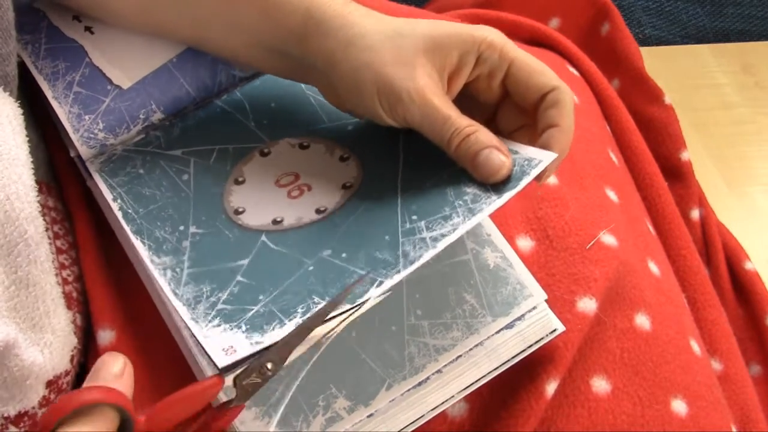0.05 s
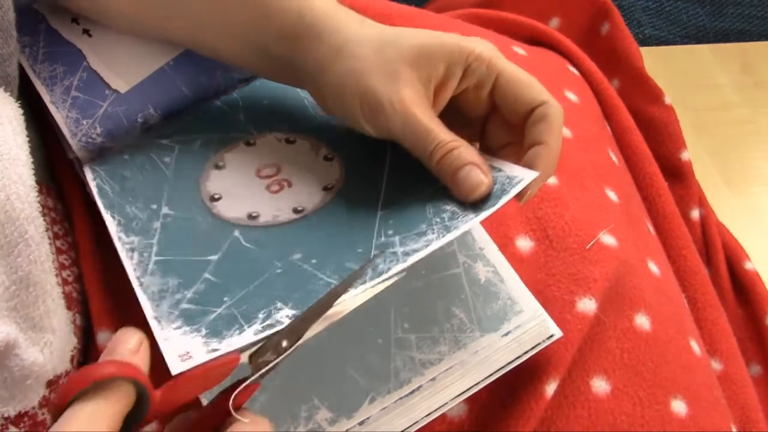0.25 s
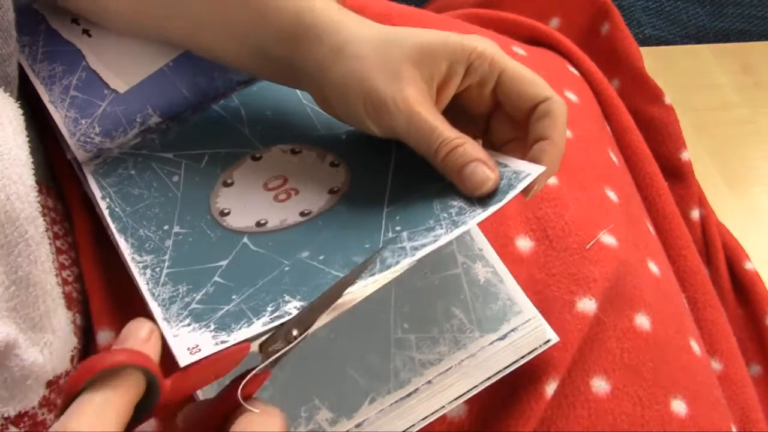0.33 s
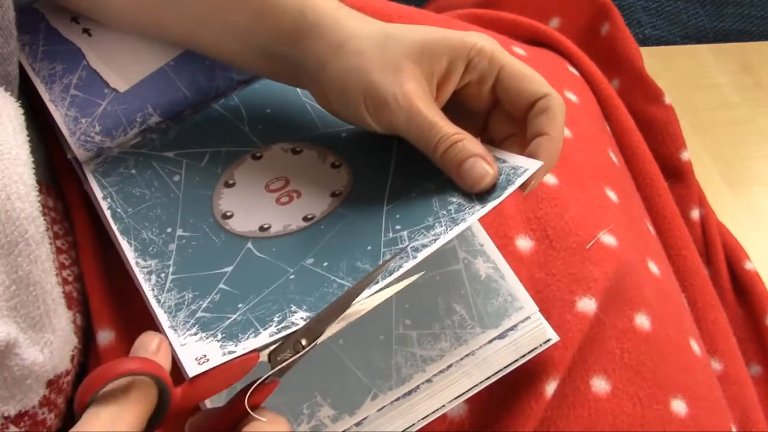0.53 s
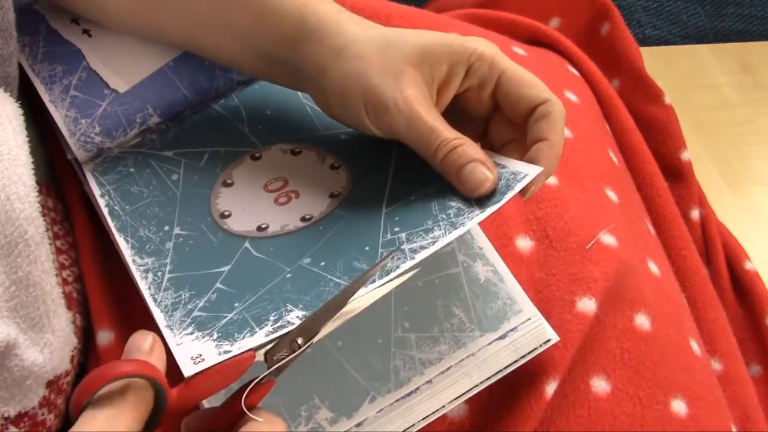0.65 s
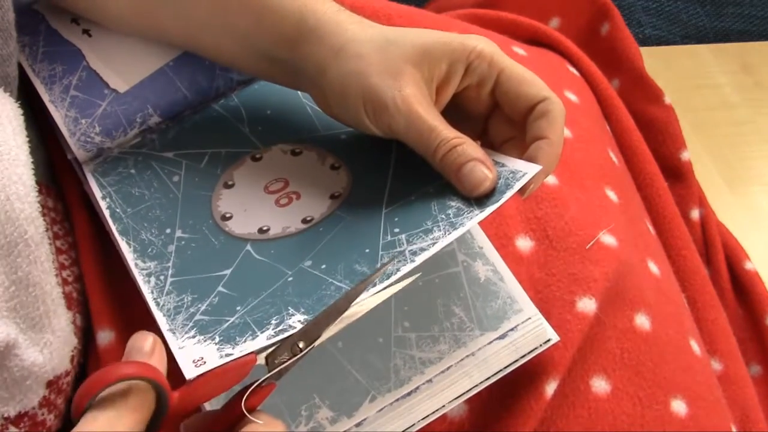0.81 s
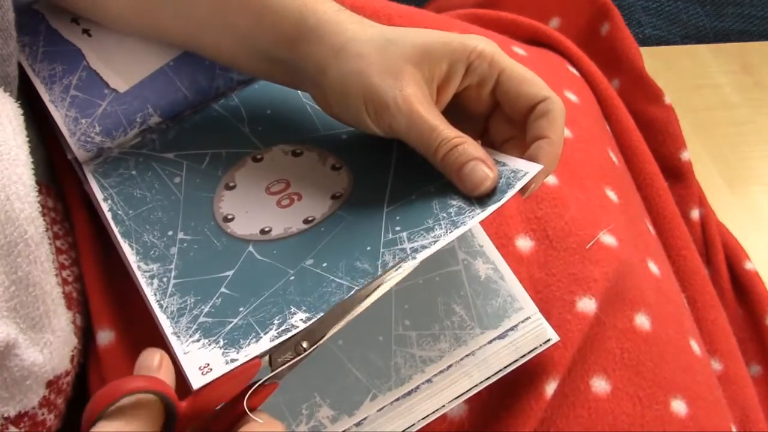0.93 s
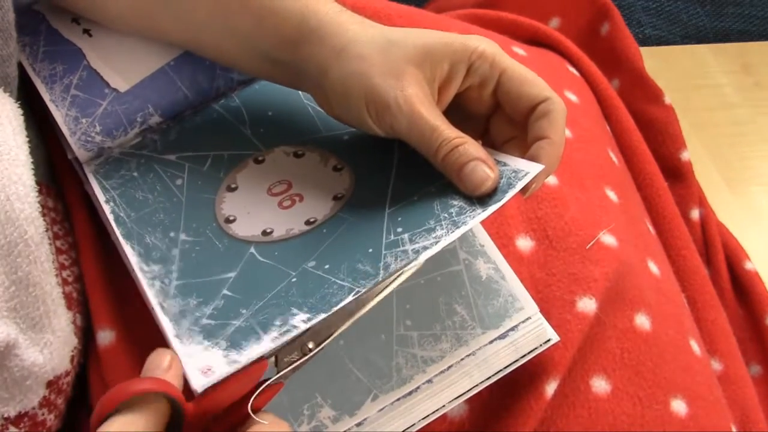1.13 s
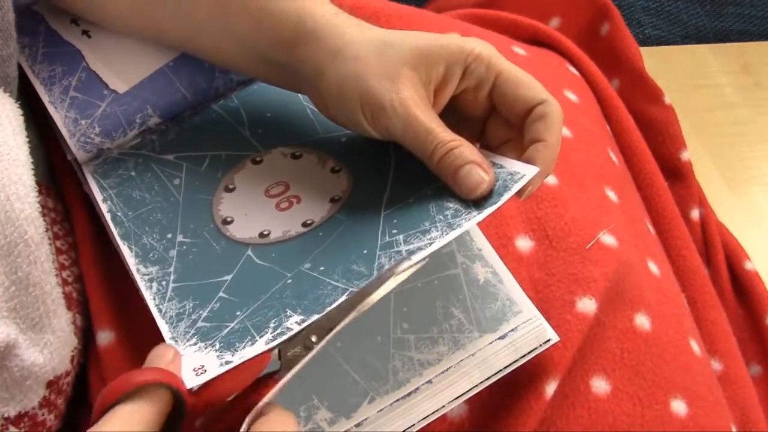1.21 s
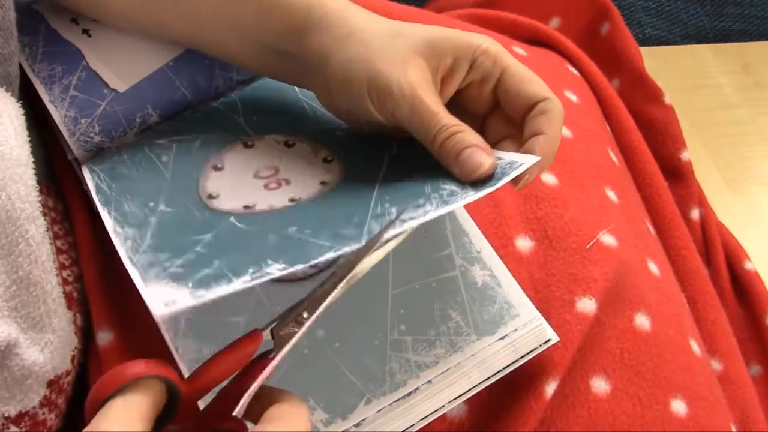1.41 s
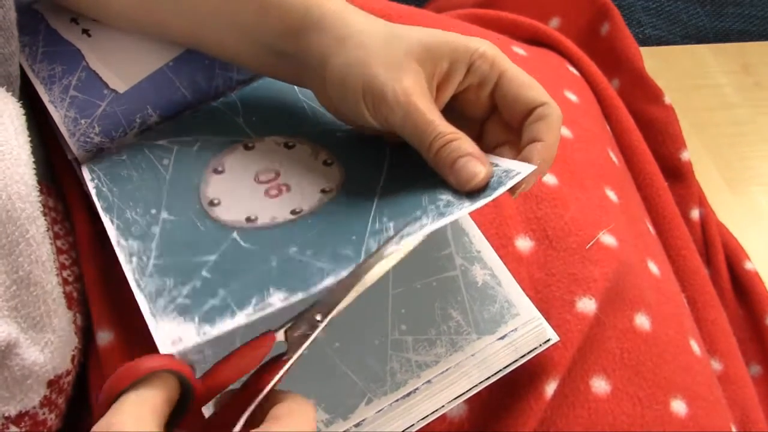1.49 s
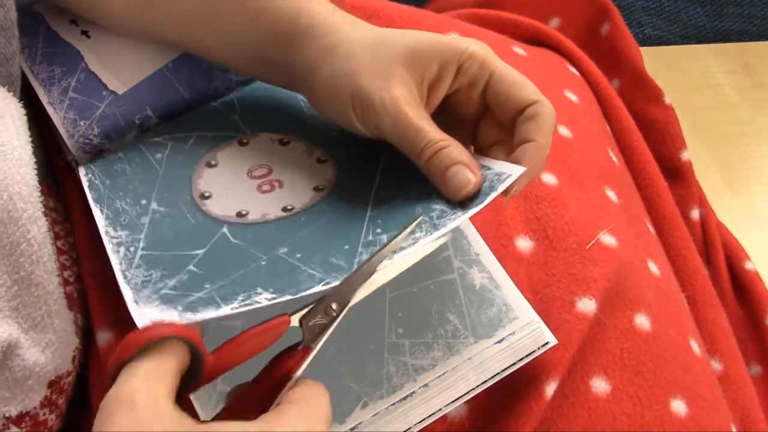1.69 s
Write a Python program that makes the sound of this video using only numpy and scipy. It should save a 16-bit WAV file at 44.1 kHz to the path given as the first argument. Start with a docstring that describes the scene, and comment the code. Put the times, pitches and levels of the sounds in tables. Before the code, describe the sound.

Scissors cutting a thick book page, heard close and nearly centred in a quiet small room. From 0 to 0.4 seconds blades scrape and click, with a knock at 0.2 and the loudest metallic clack near 0.27. A lull holds only faint rustling. From 0.9 to 1.1 fibres crackle and tear in sharp bursts. From 1.2 to 1.75 blades scrape, tick and knock, strongest near 1.46.

```python
"""Scissors cut a thick book page close to the microphone in a quiet room, while the page rustles faintly.
First the blades scrape along each other and the sheet (filtered grains) and snap shut with a clack
(ringing steel modes and a slap of paper noise over soft thumps and clicks). After a lull they bite again:
fibres crackle, and bursts of tearing make the sheet ring. Last, the scissors are reopened and pushed on,
scraping, knocking and ticking against the page. A weak room tail and a faint stereo smear surround it all."""
import sys
import numpy as np
from scipy import signal
from scipy.fft import rfft, irfft, next_fast_len
from scipy.io import wavfile
from scipy.ndimage import map_coordinates

SR = 44100
rng = np.random.default_rng(int(sys.argv[2]) if len(sys.argv) > 2 else 0)


def int16_out(signal):
    """Quantize to a 16-bit WAV file."""
    q = np.round(np.clip(np.atleast_2d(signal).T, -1, 1) * 32767)
    wavfile.write(sys.argv[1], SR, q.astype(np.int16))


N = 77175


def amp(db):
    """Turn decibels into a gain."""
    return 10 ** (np.asarray(db) / 20)


def unit(x):
    """Scale to an rms (average strength) of 1."""
    return x / np.sqrt(np.mean(x ** 2) + 1e-20)


def clock():
    """The time of each sample in seconds."""
    return np.arange(N) / SR


def along(points, hz):
    """Read a curve of (hz, value) points, joined on a logarithmic pitch axis."""
    point_hz, value = np.transpose(points)
    return np.interp(np.log(hz + 1), np.log(point_hz + 1), value)


def wobble(rate):
    """A smooth random curve with rate random knots a second."""
    return map_coordinates(rng.standard_normal(N // 50), [clock() * rate], mode="mirror")


def coloured(x, spectrum, tilt_db=0):
    """Filter x to a spectrum shape of unit power, tilted by tilt_db per octave above 1500 Hz."""
    m = 2 * next_fast_len(N // 2 + SR // 8)
    hz = np.fft.rfftfreq(m, 1 / SR)
    octaves = np.log2(np.maximum(hz, 1500) / 1500)
    gain = unit(amp(along(spectrum, hz) + tilt_db * octaves))
    # folding the cepstrum makes the filter respond only after its input, never before
    cepstrum = irfft(np.log(np.maximum(gain, 1e-6)))
    fold = np.r_[1, np.full(m // 2 - 1, 2), 1, np.zeros(m // 2 - 1)]
    response = np.exp(rfft(cepstrum * fold))
    return irfft(rfft(x, m) * response)[:N]


def grains(rate, spread_db):
    """Tiny impulses of random time, sign and size, about rate a second, with rms 1."""
    hits = rng.random(N) < rate / SR
    signs = rng.choice([-1, 1], N)
    sizes = amp(spread_db * np.clip(rng.standard_normal(N), -2, 2))
    return unit(hits * signs * sizes)


def burst(x, envelope):
    """Shape x so that it carries exactly the energy of the envelope."""
    return unit(x * envelope) * np.sqrt(np.mean(envelope ** 2))


def stroke(start, length, swell_db, release):
    """Envelope of one movement: quick attack, swelling hold, then a fall of 60 dB per release time."""
    attack_s = 0.011
    t = clock() - start
    attack = np.clip(t / attack_s, 0, 1)
    swell = swell_db * (np.clip(t / length, 0, 1) - .5)
    fall = 60 * np.maximum(t - length, 0) / release
    return attack * amp(swell - fall)


def sliding():
    """Blades rub in dense micro-slips: a papery body, a scrape and a steely hiss on top."""
    # blade strokes: start_s, length_s, level_db, swell_db (over the stroke),
    # body_db and hiss_db (added to the layer's level), release_s (time to fall 60 dB)
    strokes = [(-.01, 0.023, -47.5, -10, 4, 4, .06), (0.015, 0.039, -61, 8, 4.5, -7, 0.15),
               (.112, 0.05, -51.5, 10.5, -3, -3.5, 0.074), (0.17, 0.026, -45, -11, 2.5, -18, 0.061),
               (0.204, 0.075, -53, 0, 0, 0, 0.059), (0.279, .036, -53, -2, 7, 6.5, .024),
               (0.312, 0.058, -45.5, -1.5, -5.5, 2, 0.064), (0.428, 0.032, -52, 1, 1, -5, 0.11),
               (0.62, 0.089, -64.5, -2.5, 0.5, -1.5, 0.16), (1.218, 0.031, -47.5, 2.5, -4, -4.5, 0.026),
               (1.249, 0.027, -45, 1.5, 0.5, 0.5, 0.066), (1.324, 0.016, -59.5, 6.5, 2, -6.5, 0.26),
               (1.417, 0.0097, -44.5, 3.5, 0.5, -1, 0.034), (1.43, 0.068, -51, -0.5, 1, -7, 0.05),
               (1.526, 0.061, -45, 7.5, 0, -4, 0.053), (1.587, 0.027, -45, 5, -2, -2.5, 0.17),
               (1.668, 0.034, -53.5, 6, 0.5, -4, .04), (1.706, 0.061, -52, -12, -4, 2.5, .05)]
    # sheet rubbed by the blades: pitch_hz, level_db (per Hz, shape only)
    body_colour = [(30, -54), (100, -34), (200, -21.5), (400, -8.5), (620, -11.5), (1150, -7), (1550, -1.5),
                   (2150, -11.5), (3200, -32), (16000, -78)]
    # blades scraping along each other: pitch_hz, level_db (per Hz, shape only)
    scrape_colour = [(500, -36), (1700, -23.5), (2250, -3.5), (2700, 1), (3400, -2.5), (4400, -14),
                     (6000, -22), (16000, -35)]
    # blades hissing along each other: pitch_hz, level_db (per Hz, shape only)
    hiss_colour = [(2500, -46), (4000, -7), (5200, -5), (6000, -4.5), (7300, 2), (8300, -7), (9300, -12.5),
                   (12000, -17), (16000, -30)]
    body_level_db, scrape_level_db, hiss_level_db = -5.5, -1.5, -8.5
    slips_per_s, slip_spread_db, waver_db = 5000, 4, 1.2

    body, scrape, hiss = np.zeros((3, N))
    for start, length, db, swell_db, body_db, hiss_db, release in strokes:
        envelope = amp(db) * stroke(start, length, swell_db, release)
        body += envelope * amp(body_level_db + body_db)
        scrape += envelope * amp(scrape_level_db)
        hiss += envelope * amp(hiss_level_db + hiss_db)
    waver = amp(waver_db * wobble(140))
    out = np.zeros(N)
    for level, colour in [(body, body_colour), (scrape, scrape_colour), (hiss, hiss_colour)]:
        slips = grains(slips_per_s, slip_spread_db)
        out += coloured(level * waver * slips, colour)
    return out


def rustling():
    """The held page stirs faintly all the time: sparse grains of wavering strength."""
    # handled page: pitch_hz, level_db (per Hz, shape only)
    page_colour = [(30, -61), (120, -22), (300, 6.5), (600, -8), (1050, 7.5), (1600, 1), (2200, -3),
                   (2900, -8), (5000, -14), (16000, -21)]
    level_db, waver_db = -70.5, 6
    stirring = grains(1500, 6.0) * amp(waver_db * wobble(25.93))
    return amp(level_db) * unit(coloured(stirring, page_colour))


def room_tone():
    """Steady quiet air as filtered noise, in mid (left and right alike) and side (their difference)."""
    # room tone: pitch_hz, level_db (per Hz, shape only)
    air_colour = [(25, -23), (60, -12.5), (130, -1), (300, 1), (800, -4.5), (2100, -8), (6000, -19.5),
                  (11000, -24.5), (14000, -34), (16000, -63)]
    # how alike left and right are: pitch_hz, likeness (1 = identical)
    likeness = [(30, 0.19), (80, 0.48), (170, 0.18), (400, 0.25), (2000, 0.63), (12000, 1)]
    level_db = -66
    hz = np.fft.rfftfreq(N, 1 / SR)
    turn = np.arccos(np.clip(along(likeness, hz), -1, 1)) / 2
    noise = rfft(rng.standard_normal((2, N)))
    shares = [np.cos(turn), np.sin(turn)]  # mid and side
    air = irfft(noise * amp(along(air_colour, hz)) * shares, N)
    return amp(level_db) * air / np.std(air[0])


def pinging():
    """One resonance of blade or sheet sings out briefly, as the blades catch or the paper snaps."""
    # single resonances of blade or sheet: start_s, level_db, pitch_hz, t60_s (time to fall 60 dB)
    pings = [(0, -44, 1432, 0.092), (0, -39.5, 2460, 0.057), (0.2018, -22.5, 2660, 0.018),
             (0.219, -27.5, 3760, 0.0076), (.741, -48.5, 1610, 0.019), (1.0667, -19, 2780, 0.02),
             (1.1032, -23.5, 2850, 0.019), (1.4647, -28, 1597, 0.027), (1.4652, -26, 2480, 0.024),
             (1.4766, -29, 2680, .009)]
    attack_s = 0.00038  # time constant
    out = np.zeros(N)
    for start, db, hz, t60 in pings:
        t = np.maximum(clock() - start, 0)
        envelope = amp(db - 60 * t / t60) * (1 - np.exp(-t / attack_s))
        out += envelope * np.sin(2 * np.pi * (hz * t + rng.random()))
    return out


def clicking():
    """An edge catches and lets go: a sharp crack of dense grains that dies away fast."""
    # catching edges: start_s, level_db, t60_s (time to fall 60 dB), tilt_db (per octave)
    catches = [(0.053, -49.5, 0.021, -4), (0.1223, -50, .018, -5.5), (0.1318, -48.5, 0.052, -1),
               (0.1547, -32.5, 0.018, -0.5), (0.175, -43.5, 0.036, 10), (0.19, -39, 0.015, -6),
               (0.192, -36, 0.024, -8.5), (0.201, -28.5, 0.014, -5), (0.2645, -20.5, 0.011, -1.5),
               (0.3316, -42, .014, -5), (0.397, -49.5, 0.073, -6.5), (.715, -52.5, 0.01, 13),
               (1.2715, -34.5, 0.0085, 0.5), (1.3964, -44.5, 0.046, -6), (1.464, -34.5, 0.016, -0.5),
               (1.474, -34, 0.014, -3), (1.688, -47.5, 0.025, 4)]
    # sound of a catch: pitch_hz, level_db (per Hz, shape only)
    click_colour = [(30, -64), (130, -40), (400, -4), (1200, -4.5), (2800, 7), (4300, -1), (6000, 0.5),
                    (8600, -0.5), (10500, -6.5), (13000, -14.5), (16000, -23.5)]
    out = np.zeros(N)
    for start, db, t60, tilt_db in catches:
        t = clock() - start
        envelope = (t >= 0) * amp(db - 60 * np.maximum(t, 0) / t60)
        out += coloured(burst(grains(12000, 5.2), envelope), click_colour, tilt_db)
    return out


def thumping():
    """The page stack flexes under the harder pushes: a soft thump of a few low modes."""
    # pushes of the blades: start_s, level_db, pitch_hz, t60_s (time to fall 60 dB)
    pushes = [(0.185, -46, 262, 0.077), (0.2181, -43.5, 340, .045), (.268, -40.5, 206, 0.075),
              (0.304, -47.5, 345, 0.037), (0.372, -45, 350, 0.027), (1.27, -42.5, 310, 0.037),
              (1.461, -35, 375, 0.029), (1.475, -43.5, 305, 0.057), (1.545, -49, 377, 0.048)]
    # ways the stack swings: multiple (of the pitch), level_db (relative)
    stack_modes = [(.58, -16), (.84, -9), (1.001, 3.5), (1.2, -2)]
    attack_s = 0.0016  # time constant
    out = np.zeros(N)
    for start, db, hz, t60 in pushes:
        t = np.maximum(clock() - start, 0)
        envelope = amp(db - 60 * t / t60) * (1 - np.exp(-t / attack_s)) ** 2
        flex = np.zeros(N)
        for multiple, level in stack_modes:
            flex += amp(level) * np.sin(2 * np.pi * (hz * multiple * t + rng.random()))
        out += burst(flex, envelope)
    return out


def knocking():
    """Steel meets steel and rings the scissors; the hand damps them fast and a faint ring lingers."""
    # the scissors' ring: pitch_hz, level_db (relative), t60_s (before the knock's share)
    blade_modes = [(290, 1, 0.014), (380, -10, 0.042), (464.5, -12, 0.072), (609, -12, 0.038),
                   (773, -12, 0.061), (900, -12.5, 0.075), (1003, -2, 0.076), (1150, -2, 0.045),
                   (1325, -1, 0.046), (1563, 2, 0.035), (1648, 1, 0.038), (2026, 8, 0.021),
                   (2130, -8.5, .05), (2330, -11, 0.017), (2454, 1, 0.035), (2560, -5, 0.025),
                   (2940, -2.5, 0.022), (3330, 0, .016), (3730, -2, 0.014)]
    # knocks: start_s, ring_db, middle_db, treble_db, bass_db (added to those modes),
    # share (ring length as a fraction)
    knocks = [(0.2026, -27, 1.5, -5, 1, 0.53), (0.2659, -15.5, -4.5, -2, 1, 0.89),
              (1.273, -41.5, 2, 5, 1, 0.83), (1.422, -36.5, 2, 6, 9, 0.84), (1.4642, -24, 8, 0, 5, 0.6),
              (1.4754, -33, 7.5, 4, 12, 0.94)]
    attack_s = 0.0013  # time constant
    after_ring_db, after_ring_s = -37, 0.37  # relative level; time to fall 60 dB, before the share
    phase_scatter, low_cut_hz = .14, 201  # scatter in turns
    out, t = np.zeros(N + SR), np.arange(SR // 4) / SR
    hz, mode_db, t60 = np.transpose(blade_modes)[:, :, None]
    for start, db, middle_db, treble_db, bass_db, share in knocks:
        change_db = np.select([hz > 2200, hz > 1430, hz < 600], [treble_db, middle_db, bass_db])
        gains = amp(mode_db + change_db)
        decay = amp(-60 * t / (t60 * share))
        decay = decay + amp(after_ring_db - 60 * t / (after_ring_s * share))
        # neighbouring modes swing in opposition, give or take the scatter
        phase = np.arange(len(hz))[:, None] / 2 + phase_scatter * rng.standard_normal(hz.shape)
        ring = np.sum(gains * decay * np.sin(2 * np.pi * (hz * t + phase)), axis=0)
        attack = 1 - np.exp(-t / attack_s)
        out[round(start * SR):][:len(t)] += amp(db) * ring * attack * 2 / np.linalg.norm(gains)
    low_cut = signal.butter(2, low_cut_hz, "highpass", fs=SR, output="sos")
    return signal.sosfilt(low_cut, out[:N])


def slapping_and_cutting():
    """Paper slaps under the hard snaps; in the bite, fibres crackle and tear in bursts that ring the bent sheet."""
    # bursts of paper noise: slaps under the two hard snaps (first two rows), then tearing fibres:
    # centre_s, spread_s (of the bell-shaped burst), level_db, crackle_db (relative to the burst),
    # pitch (of the sheet, as a ratio), tilt_db (per octave)
    paper_bursts = [(0.271, 0.0012, -27, -33, 0.83, -7.5), (1.4649, 0.0015, -29, -18, 0.97, -7.5),
                    (0.919, 0.0035, -45.5, 6.5, 1, 1), (0.946, 0.0074, -48.5, 11, 0.91, -8),
                    (.9702, 0.002, -35, 4.5, 0.98, 2), (.977, 0.0031, -39.5, 3.5, 1.02, -3.5),
                    (.994, 0.003, -36.5, 0, 1.04, 3), (1.007, 0.0017, -36, 4.5, 1.07, 0.5),
                    (1.0229, 0.0021, -33.5, 0.5, 0.92, 2), (1.0264, 0.0024, -36, -7, 1.01, -.5),
                    (1.0399, 0.0017, -29.5, -9, 1.07, 1), (1.0435, 0.0021, -33, -13, 0.99, -0.5),
                    (1.053, 0.0034, -35.5, -15, 1.016, -2), (1.0684, 0.0015, -25.5, -8, 1.02, 2.5),
                    (1.0999, 0.0019, -35.5, 8, 1, 2), (1.1027, 0.00082, -27, -1.5, 0.97, 1.5)]
    # sheet held between the blades: pitch_hz, level_db (per Hz, shape only)
    sheet_colour = [(80, -71), (250, -28.5), (430, -21), (620, -24), (850, -23), (1100, -6.5), (1280, -16),
                    (1520, 0), (1850, -4.5), (2250, -10), (2780, 2), (3100, -12.5), (3450, -4.5),
                    (3900, -12.5), (4400, -26), (5100, -21.5), (5900, -34), (7000, -21.5), (10000, -56)]
    # fine crackle of the paper: pitch_hz, level_db (per Hz, shape only)
    crackle_colour = [(40, -34), (200, -7), (450, 12.5), (900, 12.5), (4000, -20.5), (5200, 9), (6000, -8),
                      (7200, -3), (9400, 0.5), (10500, -5.5), (11700, -0.5), (12200, -11), (12900, 1),
                      (13800, -9), (16000, -14)]
    bite_start_s, bite_grow_db, bite_release_s = .915, 4, 0.32  # pressure rises along the bite
    fibres_per_s, cracks_per_s, spread_db = 5000, 1800, 4
    crackle_level_db = -17.5  # applied to all the crackle, of bite and bursts
    chatter = unit(amp(2.5 * wobble(350)))  # rapid unevenness

    def bite(db, end):
        """One layer of fibres breaking all along the bite."""
        envelope = amp(db) * stroke(bite_start_s, end - bite_start_s, bite_grow_db, bite_release_s)
        return envelope * chatter * grains(fibres_per_s, spread_db)

    body = coloured(bite(-44, 1.023), sheet_colour)
    crackle = bite(-39, 1.051)
    paper_grains = grains(fibres_per_s, spread_db)
    fine_cracks = grains(cracks_per_s, spread_db)
    for centre, spread, db, crackle_db, pitch, tilt_db in paper_bursts:
        envelope = amp(db) * np.exp(-.5 * ((clock() - centre) / spread) ** 2)
        bent_sheet = [(hz * pitch, level) for hz, level in sheet_colour]
        ring = coloured(paper_grains * envelope, bent_sheet, tilt_db)
        body += unit(ring) * np.sqrt(np.mean(envelope ** 2))
        crackle += burst(fine_cracks, envelope * amp(crackle_db))
    return body + amp(crackle_level_db) * coloured(crackle, crackle_colour)


def room(x):
    """A short, weak room tail of fading noise, as mid and side."""
    # fading of the tail: pitch_hz, t60_s (time to fall 60 dB)
    fading = [(150, 0.3), (1000, 0.36), (3000, 0.23), (8000, 0.21), (15000, 0.12)]
    # side part of the tail: pitch_hz, level_db (relative to mid)
    side_level = [(60, -1), (250, -7), (1000, -23), (4000, -15), (14000, -52)]
    level_db, gap_s = -16, 0.0015
    hz, t, z = signal.stft(rng.standard_normal((2, SR // 2)), SR, nperseg=256)
    width = np.array([np.ones_like(hz), amp(along(side_level, hz))])[:, :, None]
    decay = amp(-60 * t / along(fading, hz)[:, None])
    tail = signal.istft(z * width * decay, SR, nperseg=256)[1]
    # silent for half the gap, then fading in over one gap length
    tail = tail * np.clip(np.arange(tail.shape[1]) / SR / gap_s - .5, 0, 1)
    wet = signal.fftconvolve(x[None], tail / np.linalg.norm(tail[0]), axes=1)[:, :N]
    return amp(level_db) * wet


def stereo_smear(x):
    """A faint, mostly treble smear of the near sounds, opposite in left and right."""
    # colour of the smear: pitch_hz, level_db (shape only)
    smear_colour = [(100, -32), (400, -25), (1200, -15), (3000, 9), (5000, 9), (14000, 6)]
    level_db, fade_s = -34.5, 0.0068  # fade as a time constant
    t = np.arange(SR // 50) / SR
    fading_noise = rng.standard_normal(len(t)) * np.exp(-t / fade_s)
    smeared = signal.fftconvolve(x, fading_noise / np.linalg.norm(fading_noise))[:N]
    return amp(level_db) * coloured(smeared, smear_colour)


def scene():
    """The scissors almost straight ahead, in the room."""
    balance_db = 0.2  # left up and right down by this much
    near = sliding() + rustling() + pinging() + clicking() + thumping() + knocking()
    near = near + slapping_and_cutting()
    mid, side = room(near) + room_tone()
    mid, side = near + mid, side + stereo_smear(near)
    return np.array([mid + side, mid - side]) * amp([[balance_db], [-balance_db]])


def record(dry):
    """The recorder keeps nothing above its band limit."""
    top_hz = 15850
    m = next_fast_len(N + SR // 4)
    kept = np.fft.rfftfreq(m, 1 / SR) < top_hz
    return irfft(rfft(dry, m) * kept, m)[:, :N]


dry = scene()
out = record(dry)
int16_out(out)
```